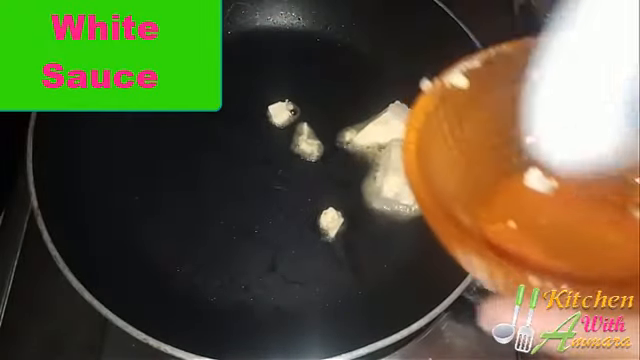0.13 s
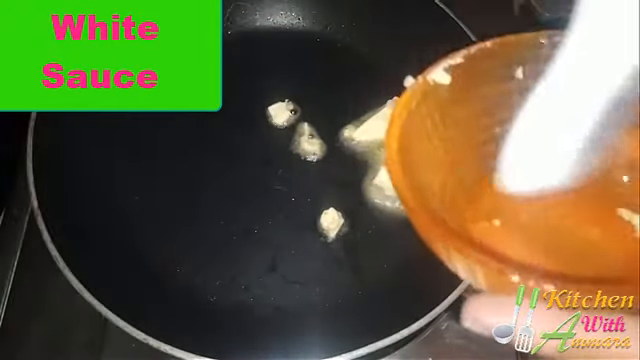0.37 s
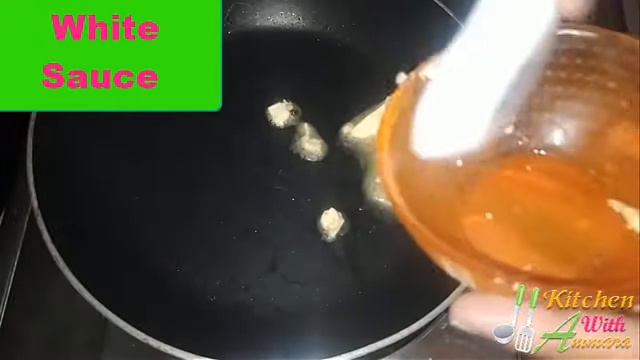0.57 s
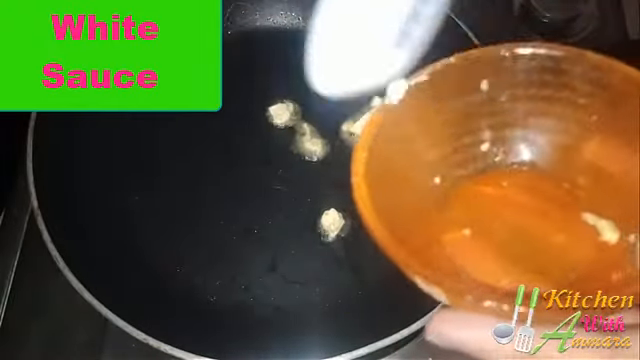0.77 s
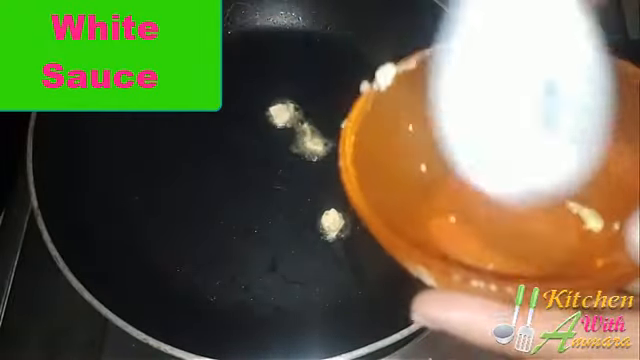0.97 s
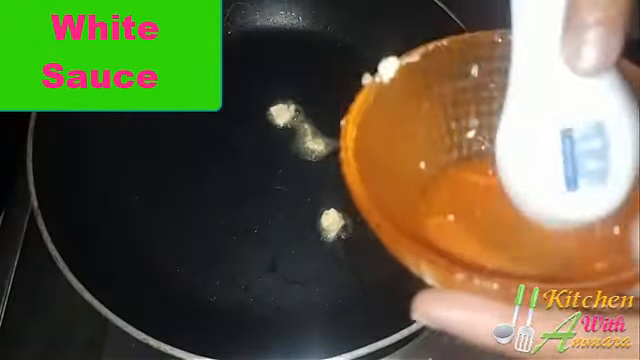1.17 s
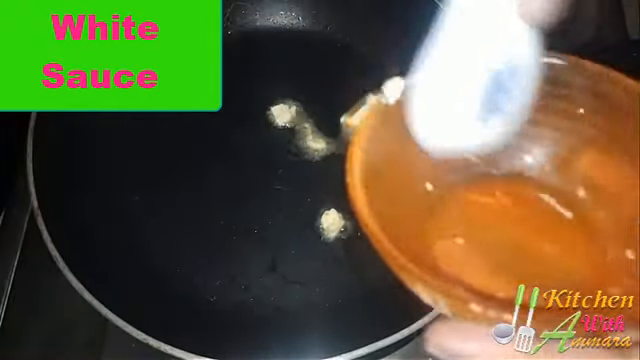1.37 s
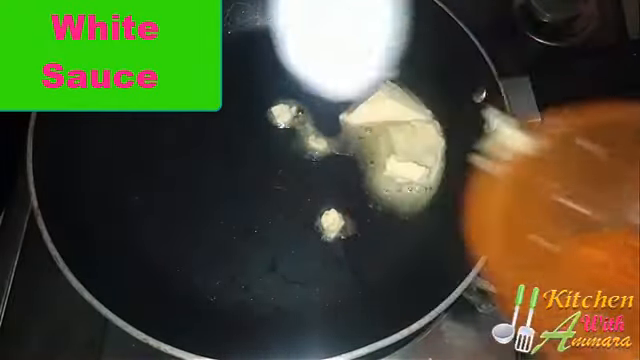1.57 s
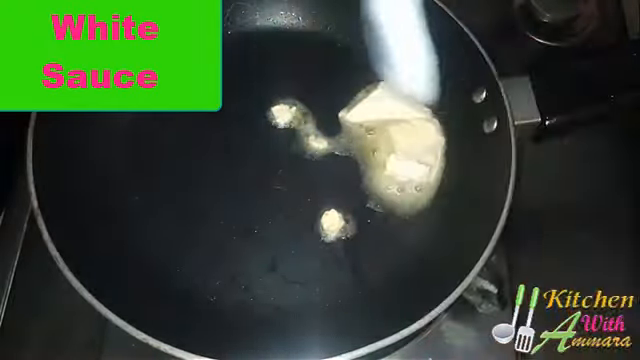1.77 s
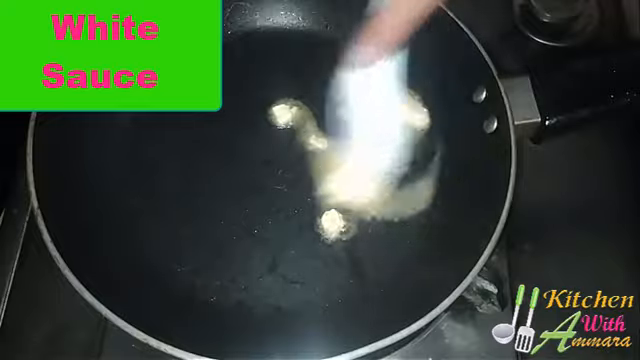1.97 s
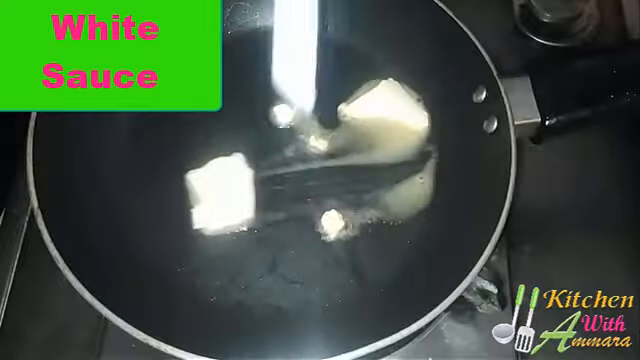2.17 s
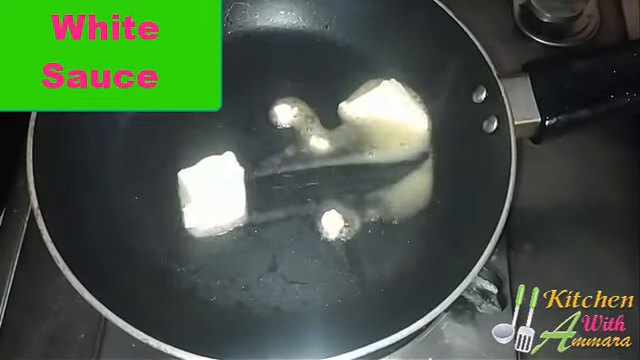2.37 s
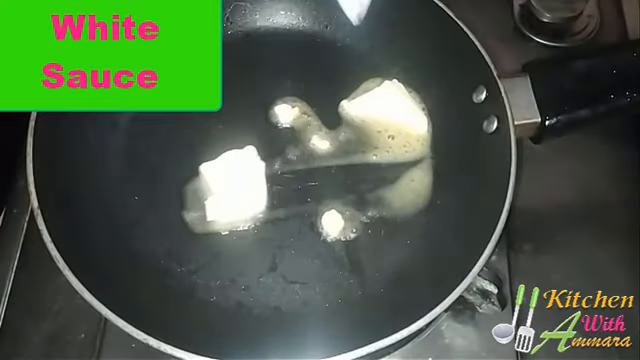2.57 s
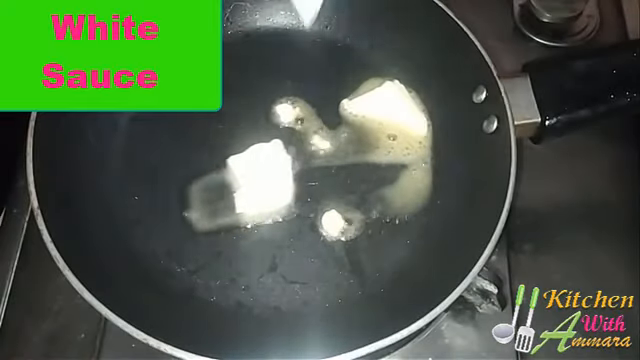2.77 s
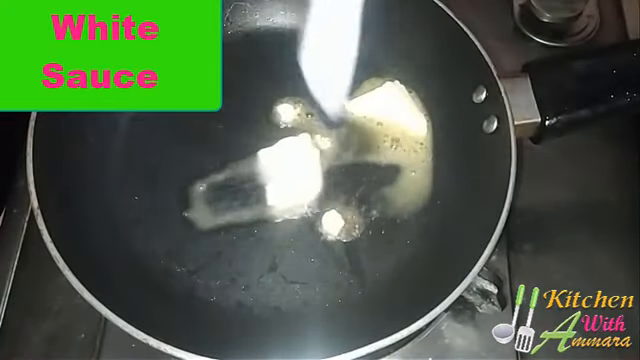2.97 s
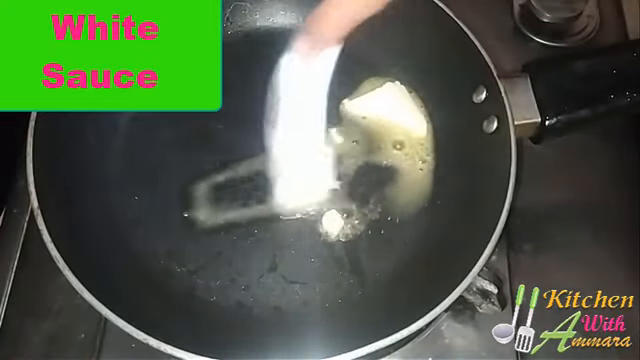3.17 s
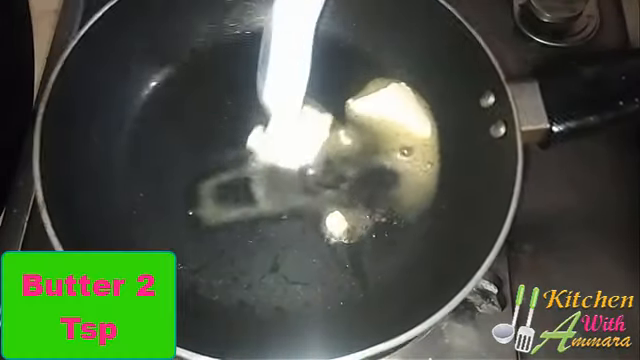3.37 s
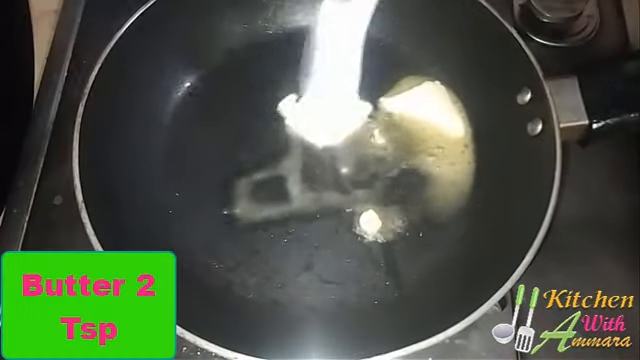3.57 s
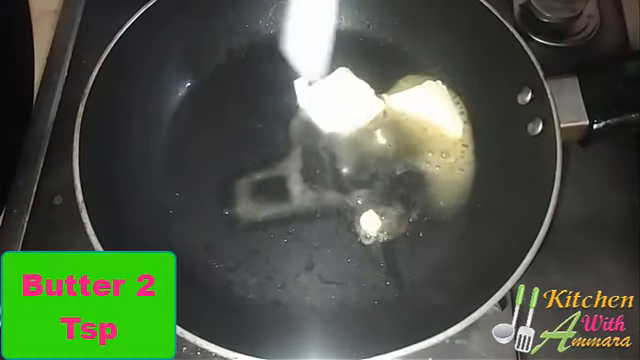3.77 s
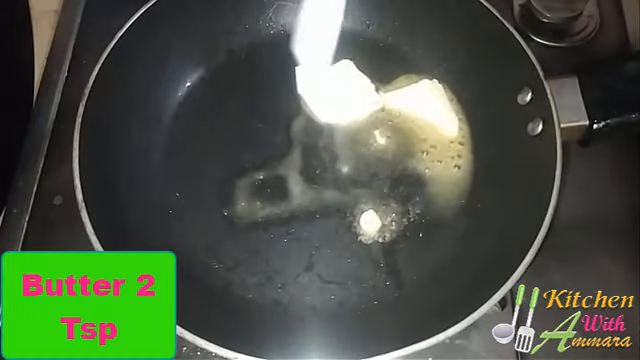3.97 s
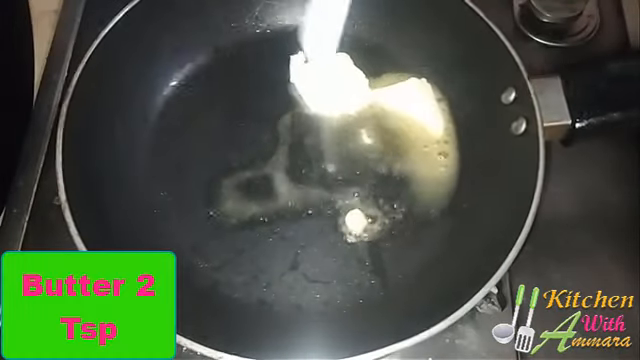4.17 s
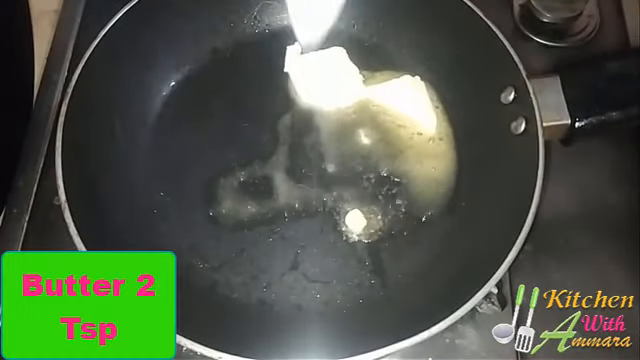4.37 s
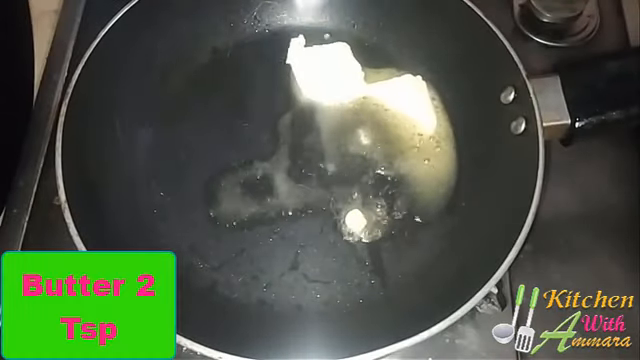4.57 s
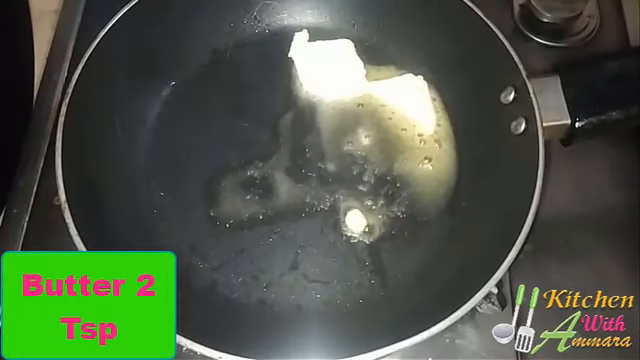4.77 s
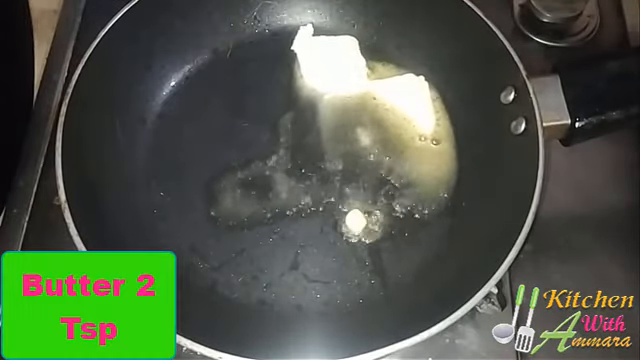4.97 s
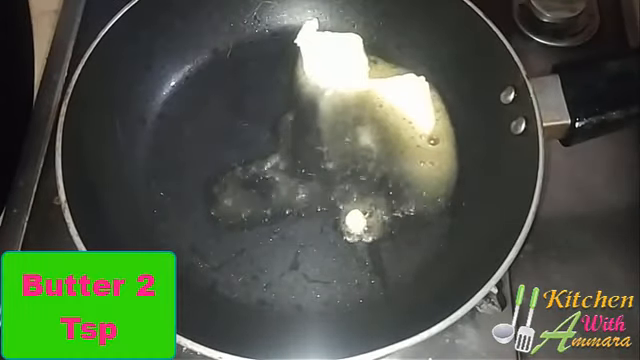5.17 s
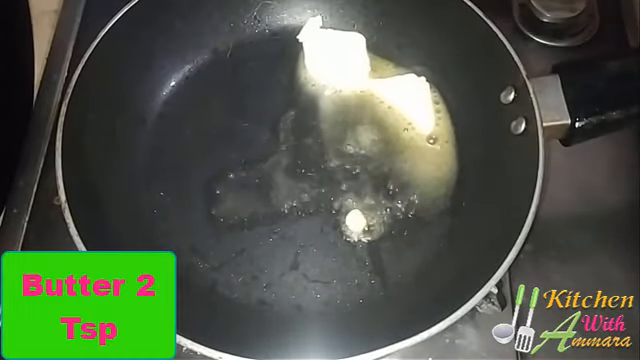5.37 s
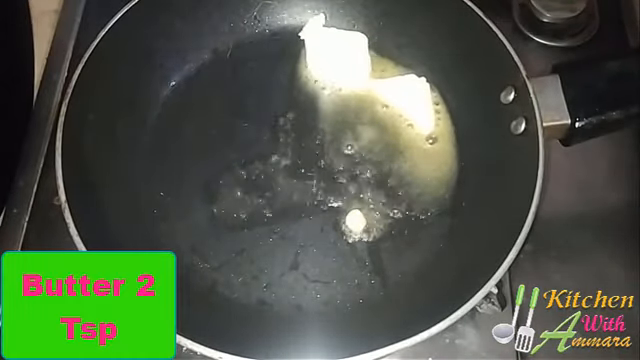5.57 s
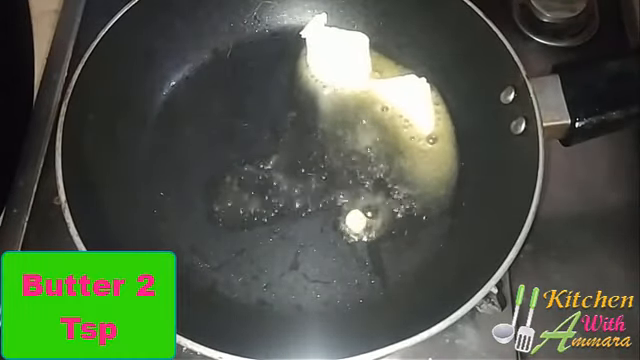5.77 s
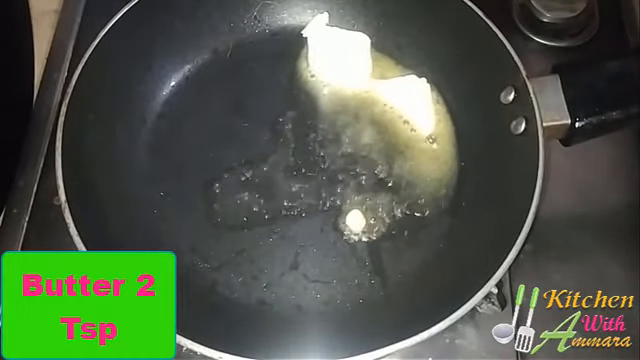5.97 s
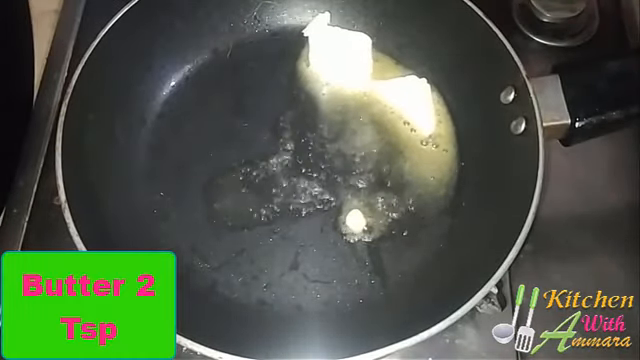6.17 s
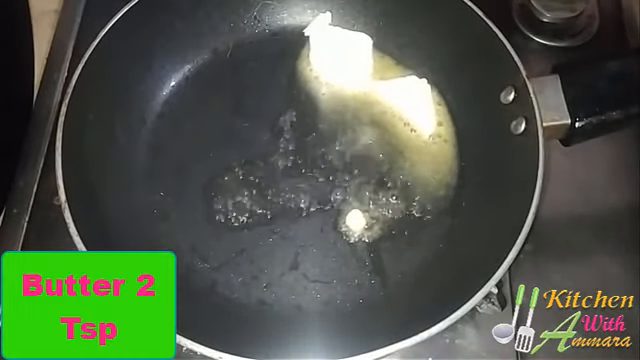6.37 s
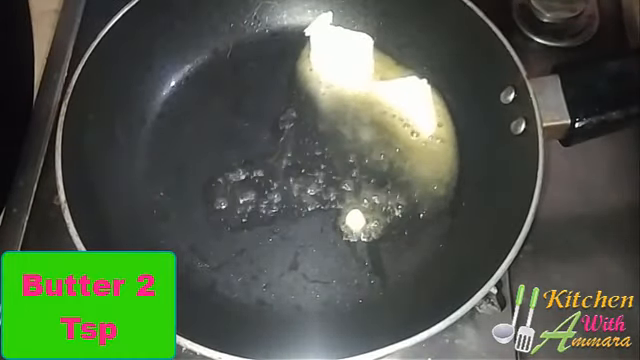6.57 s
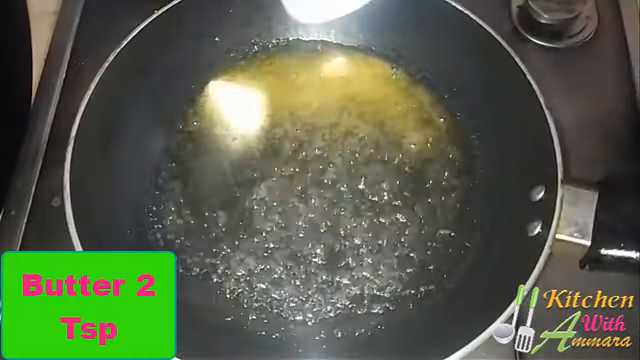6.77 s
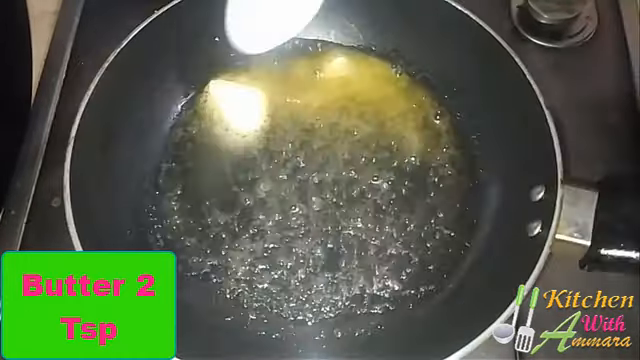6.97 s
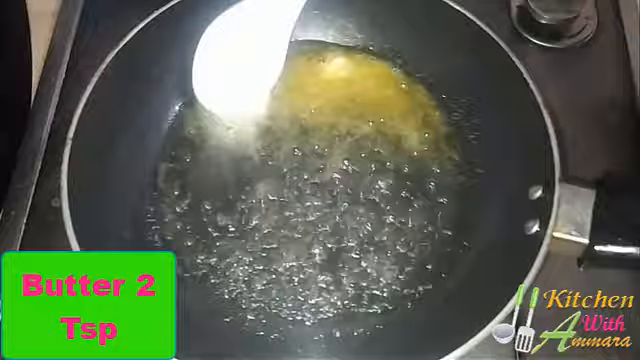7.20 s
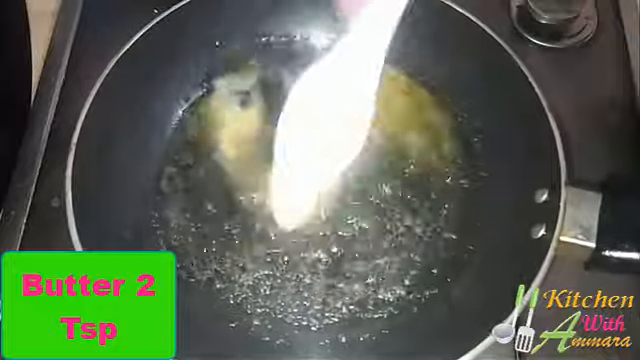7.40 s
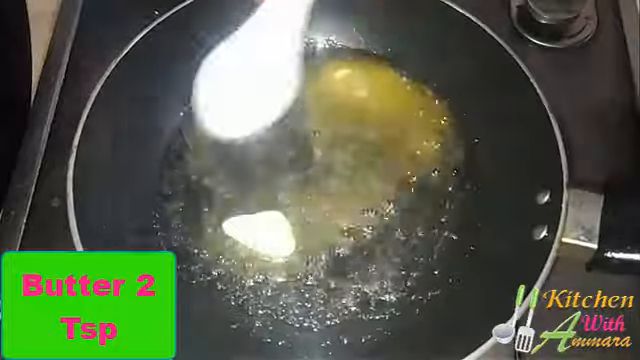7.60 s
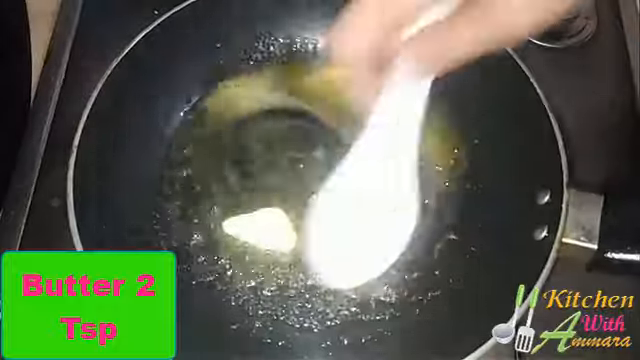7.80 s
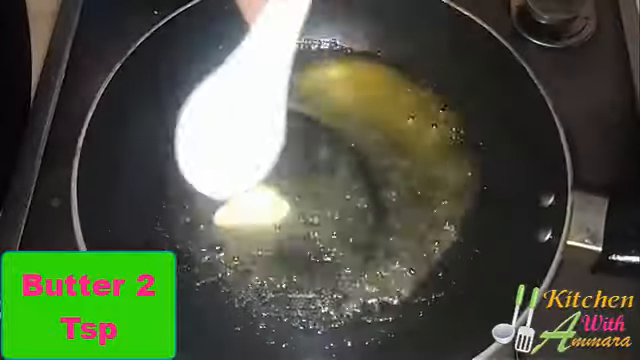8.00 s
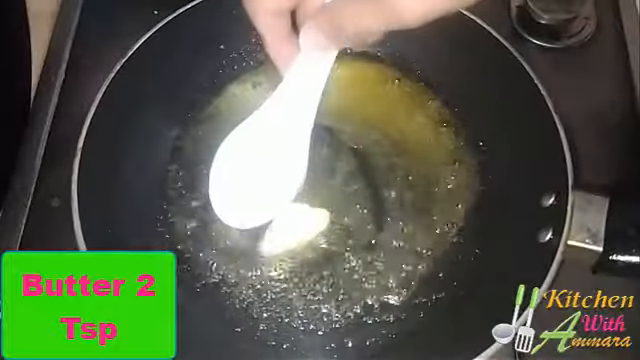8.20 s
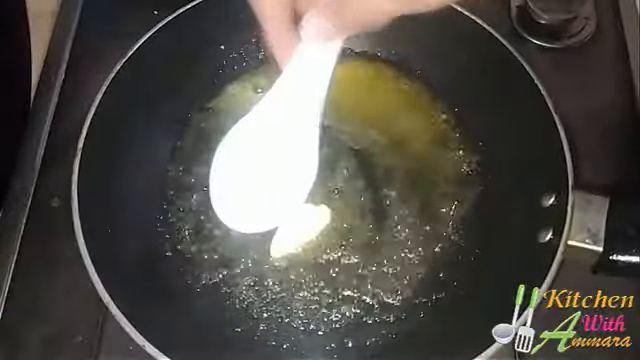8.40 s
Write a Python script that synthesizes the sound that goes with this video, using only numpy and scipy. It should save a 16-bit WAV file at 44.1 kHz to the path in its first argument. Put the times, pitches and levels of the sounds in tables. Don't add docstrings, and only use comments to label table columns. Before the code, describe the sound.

Fine, bright frying hiss with popping fat, heard close in a lightly reverberant kitchen. First come hard hollow knocks of a spoon on a bowl, some ringing high. A rough stick-slip scrape of pan on steel follows, ending in a short squeal. A calmer stretch holds dull bumps, ticks and spray flares; finally a clacking spoon grinds the pan in two strokes, sizzle surging, with one last hard knock.

```python
import sys
import numpy as np
from scipy import signal
from scipy.fft import rfft, irfft, next_fast_len
from scipy.io import wavfile
from scipy.ndimage import uniform_filter1d, minimum_filter1d, map_coordinates

SR = 44100
rng = np.random.default_rng(int(sys.argv[2]) if len(sys.argv) > 2 else 0)


def ratio_of_db(decibels):
    return 10 ** (np.asarray(decibels, float) / 20)


def put_to_file(sound):
    columns = np.atleast_2d(sound).T
    safe = np.clip(columns, -1, 1)
    whole_steps = np.round(safe * 32767)
    wavfile.write(sys.argv[1], SR, whole_steps.astype(np.int16))


N = 372204


def unit(x):
    return x / np.sqrt(np.mean(x ** 2) + 1e-20)


def along(points, hz):
    f, v = np.transpose(points)
    return np.interp(np.log(hz + 1), np.log(f + 1), v)


def curves(rows):
    s, *columns = np.transpose(rows)
    ends_early = s[-1] < N / SR - .1
    t = np.arange(N) / SR
    return [np.interp(t, s, c, left=-150, right=-150 if ends_early else c[-1]) for c in columns]


def wobble(rate):
    steps = np.arange(0, N + 16, 16)
    knots = rng.standard_normal(int(N * rate / SR) + 4)
    return np.interp(np.arange(N), steps, map_coordinates(knots, [steps * rate / SR]))


def filtered(x, response):
    m = next_fast_len(N + SR // 2)
    return irfft(rfft(x, m) * response(np.fft.rfftfreq(m, 1 / SR)), m)[..., :N]


def colour(points):
    return lambda hz: ratio_of_db(along(points, hz))


def modes(table):
    def response(f):
        return sum((-1) ** k * ratio_of_db(db) * 1j * f * width / (hz * hz - f * f + 1j * f * width)
                   for k, (hz, width, db) in enumerate(table))
    return response


def tinted(points):
    return unit(filtered(rng.standard_normal(N), colour(points)))


def grit(rate, spread_db, bed, t60):
    spread = np.minimum(rng.exponential(size=N), 3)
    sizes = (rng.random(N) < rate / SR) * ratio_of_db(spread_db * spread)
    puffs = signal.lfilter([1], [1, -ratio_of_db(-60 / (t60 * SR))], sizes)
    return unit((unit(puffs) + bed) * rng.standard_normal(N))


def bursts(times, levels_db, t60, tail_db, tail_t60):
    blows, t = np.zeros(N), np.arange(SR // 4) / SR
    np.add.at(blows, np.round(np.asarray(times) * SR).astype(int), ratio_of_db(levels_db))
    decay = ratio_of_db(-60 * t / t60) + ratio_of_db(tail_db - 60 * t / tail_t60)
    return signal.oaconvolve(blows, decay)[:N]


def snaps(times, levels_db, points):
    clicks = np.zeros(N)
    signs = rng.choice([-1, 1], len(times))
    clicks[np.round(np.asarray(times) * SR).astype(int)] = ratio_of_db(levels_db) * signs
    return filtered(clicks, colour(points)) / np.mean(colour(points)(np.fft.rfftfreq(SR, 1 / SR)))


def swells(rows):
    t = np.arange(0, N + 32, 32) / SR
    gain = 0
    for s, hold, db, rise, fall in rows:
        before, after = np.maximum(s - t, 0), np.maximum(t - s - hold, 0)
        gain = gain + ratio_of_db(db - rise * before - fall * after)
    return np.interp(np.arange(N) / SR, t, gain)


def thin(x, hz):
    return signal.sosfilt(signal.butter(3, hz, "high", fs=SR, output="sos"), x)


def placed(x, rows):
    side_db = np.interp(np.arange(N) / SR, rows[:, 0], np.clip(rows[:, -1], -4, 4))
    return x * ratio_of_db(np.array([side_db, -side_db]) / 2)


# time_s, level_db
AIR = [(0, -53), (3.6, -58.5), (8.44, -57.5)]
# frequency_hz, density_db
RUMBLE = [(12, -19), (20, 7), (32, -7.5), (83, 0), (117, -18.5), (151, -3), (173, -4.5), (204, -4.5),
          (313, -14), (392, -14), (700, -12.5), (910, -55), (1540, -120)]
# time_s, level_db
HUM = [(0, -57), (2.5, -58.5), (2.7, -91), (8.44, -96)]


def kitchen_air():
    t = np.arange(N) / SR
    hum = ratio_of_db(curves(HUM)[0] + 3 * wobble(4.5)) * np.sin(2 * np.pi * 87 * t)
    mains = ratio_of_db(-64.0 + 1.4 * wobble(3.52)) * np.sin(2 * np.pi * 150 * t)
    counter = ratio_of_db(-12.5) * bumps(fall=110)
    return (ratio_of_db(curves(AIR)[0]) + counter) * ratio_of_db(-1.4) * tinted(RUMBLE) + hum + mains


# frequency_hz, t60_s
KITCHEN = [(200, 0.81), (2000, 0.6), (8000, 0.87), (15000, 0.037)]


def room(x):
    hz, t, z = signal.stft(rng.standard_normal((2, SR // 2)), SR, nperseg=256)
    tail = signal.istft(z * ratio_of_db(-60 * t / along(KITCHEN, hz)[:, None]), SR, nperseg=256)[1]
    delayed = np.pad(x, (300, 0))
    return signal.fftconvolve(delayed[None], tail / np.linalg.norm(tail[0]), axes=1)[:, :N]


# start_s, boom_db, rustle_db
BUMPS = [(2.1, -48.5, -80), (2.66, -37, -80), (3.4, -39.5, -80), (3.671, -29, -35), (4.272, -43, -43),
         (4.363, -38.5, -46), (5.324, -49, -43.5), (6.202, -54, -46), (6.481, -51, -44), (7.375, -43, -54),
         (7.465, -33.5, -39), (8.39, -40, -78)]


def bumps(fall):
    return swells([(s, 0, db, 750, fall) for s, db, _ in BUMPS])


def rocking():
    shifts = swells([(s, 0, db, 730, 190) for s, _, db in BUMPS])
    boom = unit(filtered(rng.standard_normal(N), modes([(206.3, 6.2, 0)])))
    rustle_modes = modes([(341, 220, 1.5), (470, 170, 2.5), (670, 135, 4.0), (1360, 140, -2.0), (2120, 390, -7)])
    rustle = unit(filtered(grit(rate=51, spread_db=4.5, bed=0.28, t60=0.081), rustle_modes))
    drag_boom = ratio_of_db(curves(DRAG)[0] - 16)
    return (bumps(fall=98) + drag_boom) * boom + shifts * ratio_of_db(4.5) * rustle


# time_s, level_db
DRAG = [(2.545, -69), (2.551, -15.5), (2.815, -38.5), (2.857, -20.5), (2.897, -26), (3.1, -25),
        (3.197, -16), (3.261, -28.5), (3.4, -48)]
# start_s, peak_db
JOLTS = [(2.5082, -27), (2.5513, -8), (2.587, -10.5), (2.7637, -30), (2.8535, -12), (2.9727, -14),
         (3.0176, -16), (3.0513, -11), (3.095, -16), (3.1284, -7.5), (3.164, -15)]
# frequency_hz, width_hz, level_db
PAN = [(467, 21, -13), (980, 6.9, -2), (1653, 7.4, 8), (2100, 28, -15), (2530, 56, -17), (2988, 43, -6.5),
       (3390, 69, -20), (3980, 15, -9.5)]
# frequency_hz, density_db
RUB = [(150, -60), (250, -16.5), (467, -20), (1180, -9.5), (1630, -5), (2020, -8.5), (3970, -23.5),
       (4300, -25.5), (6000, -38), (7800, -57), (13200, -120)]
# frequency_hz, width_hz, level_db
STEEL = [(8914, 24, 12), (14190, 40, -11)]
# start_s, hold_s, level_db, rise_db_per_s, fall_db_per_s
SQUEAL = [
    (3.18, 0.0043, -22.5, 2500, 252),
]


def drag():
    rub_db, = curves(DRAG)
    slips = grit(rate=230, spread_db=0.0, bed=1.0, t60=0.0063)
    pan = unit(unit(filtered(slips, colour(RUB))) + 0.98 * unit(filtered(slips, modes(PAN))))
    s, db = np.transpose(JOLTS)
    jolts = bursts(s, db - 14, t60=0.06, tail_db=-4, tail_t60=0.066) * tinted(RUB)
    jolts = jolts + snaps(s, db - 23, RUB)
    steel = unit(filtered(slips, modes(STEEL)))
    steel_gain = ratio_of_db(6.0) * (ratio_of_db(rub_db - 20) + swells(SQUEAL))
    return ratio_of_db(rub_db) * pan + thin(jolts, hz=410) + steel_gain * steel


# start_s, peak_db, pitch_hz
TICKS = [(3.535, -38.5, 1540), (3.5787, -31, 2500), (3.6612, -31, 1600), (3.8454, -33.5, 2530),
         (3.9621, -32, 2625), (4.035, -34.5, 2560), (4.262, -26, 1330), (4.3333, -33.5, 2670),
         (4.6703, -31, 2630), (5.6864, -35, 1647), (5.7422, -37, 2600), (6.385, -31.5, 2700),
         (6.513, -34.5, 1960), (6.7871, -36.5, 2710)]


def ticks():
    out, t = np.zeros(N + SR // 10), np.arange(SR // 10) / SR
    for s, db, hz in TICKS:
        drift = np.cumsum(rng.standard_normal(len(t))) * 0.11
        tone = np.sin(2 * np.pi * hz * t + drift)
        out[round(s * SR):][:len(t)] += ratio_of_db(db + 1.8 - 60 * t / 0.062) * tone
    return out[:N]


# start_s, peak_db, pitch_hz, contact_s
THUDS = [(2.111, -32, 743, 0.013), (3.372, -16, 770, 0.004), (3.663, -21.5, 735, 0.013),
         (3.721, -33.5, 720, 0.015), (3.771, -28, 597, 0.0039), (4.26, -23, 736, 0.011),
         (4.334, -34, 747, 0.024), (4.363, -26.5, 727, 0.0074), (5.878, -24, 970, 0.0017),
         (6.163, -33, 663, 0.0062), (6.515, -38, 710, 0.0099), (7.463, -18.5, 783, 0.01),
         (8.377, -4, 865, 0.0082)]


def thuds():
    out, t = np.zeros(N + SR // 4), np.arange(SR // 4) / SR
    for s, db, hz, contact in THUDS:
        drift = np.cumsum(rng.standard_normal(len(t))) * 0.076
        puff = signal.lfilter([.3, 0, -.3], [1, -1.72, .76], rng.standard_normal(len(t)))
        shape = (1 - np.exp(-t / 0.0011)) * (np.exp(-(t / contact) ** 2) + 0.15 * ratio_of_db(-60 * t / 0.063))
        tone = np.sin(2 * np.pi * hz * t + drift)
        out[round(s * SR):][:len(t)] += ratio_of_db(db) * shape * (tone + 0.12 * puff)
    return out[:N]


# start_s, peak_db, crack_db, left_minus_right_db
RAPS = [(0.044, -35, 2, 5), (.061, -28, 5.5, 5), (0.095, -30, 4.5, 6), (.376, -33.5, 0, -4),
        (.431, -3.5, -31, 4), (0.691, -33, 5, -5), (1.153, -25, 1, -7), (1.158, -41.5, 14, -6),
        (1.269, -10.5, -1, 4), (1.33, -14.5, -11, 5), (1.517, -14, -4.5, -1), (2.3, -23, 7.5, -7),
        (3.5804, -33.5, 15.5, -8), (7.449, -20.5, -25, 2), (7.497, -4, -16, 15), (8.375, -3.5, -19, 8)]
# frequency_hz, density_db
BOWL = [(150, -50), (250, -16), (861, -11), (1100, -2.5), (1620, 0.5), (2350, -3.5), (2810, 1.5),
        (3170, -8.5), (3500, -5.5), (4550, -30), (7700, -120)]
# frequency_hz, density_db
CRACK = [(2200, -8), (3000, 13), (4000, 12), (6200, 6.5), (11000, 4), (16000, -29), (17000, -60)]


def raps():
    rows = np.array(RAPS)
    s, db, crack_db, _ = rows.T
    click = bursts(s, db - .6, t60=0.0024, tail_db=-51, tail_t60=0.059)
    hollow = bursts(s, db - 7.5, t60=0.065, tail_db=-25, tail_t60=0.1)
    crack = bursts(s, db + crack_db - .6, t60=0.011, tail_db=-20.5, tail_t60=0.24)
    blows = (click + hollow) * tinted(BOWL) + crack * tinted(CRACK) + snaps(s, db + 1, BOWL)
    return placed(thin(blows, hz=600), rows)


# start_s, pitch_hz, level_db, t60_s
PINGS = [
    (.432, 8190, -5, 0.033),
    (0.433, 8730, -8.5, 0.15),
    (0.431, 8570, -28, 0.17),
    (0.431, 8230, -5, 0.056),
    (1.268, 8180, -1, 0.036),
    (1.269, 6150, -15.5, 0.052),
    (1.518, 8130, -20.5, 0.031),
]


def pings():
    out, t = np.zeros(N + SR // 3), np.arange(SR // 3) / SR
    for s, hz, db, t60 in PINGS:
        drift = np.cumsum(rng.standard_normal(len(t))) * 0.071
        out[round(s * SR):][:len(t)] += ratio_of_db(db - 60 * t / t60) * np.sin(2 * np.pi * hz * t + drift)
    return out[:N]


# start_s, length_s, level_db, release_db_per_s, hollow_hz at the turn
STROKES = [
    (7.458, 0.0027, -29, 548, 790),
    (7.527, 0.2, -19, 122, 1160),
    (7.879, 0.14, -21.5, 450, 920),
]
# frequency_hz, density_db
SCRAPE = [(180, -71), (300, -70), (489, 4), (595, -49), (725, 2), (969, 8), (1300, -36), (1600, -2),
          (2080, -10), (2570, -5.5), (7000, -14), (9100, -43), (15400, -120)]


def scrape():
    t = np.arange(N) / SR
    rest_hz, turn_at, turn_width = 730, 0.61, 0.31
    turns, done = [], 0
    for s, length, *_ in STROKES:
        turns.append(np.exp(-((t - s - turn_at * length) / (turn_width * length)) ** 2))
        done = done + np.clip((t - s) / length, 0, 1) * (t < s + 1.4 * length)
    hollow_hz = rest_hz + sum(turn * (row[-1] - rest_hz) for turn, row in zip(turns, STROKES))
    press = swells([(s, length, db, 900, release) for s, length, db, release, _ in STROKES])
    press = press * ratio_of_db(-1.5 * sum(turns) - 2 * done)
    slips = grit(rate=700, spread_db=0.0, bed=3.4, t60=0.029)
    high = np.clip((hollow_hz - 750) / 350, 0, 1)
    low_cup, high_cup = (unit(filtered(slips, modes([(hz, 150, 0)]))) for hz in (760, 1050))
    cup = np.sqrt(1 - high) * low_cup + np.sqrt(high) * high_cup
    ring = unit(filtered(slips, modes([(1640, 39, 4.1), (1540, 30, 2.4)])))
    edge = unit(filtered(slips, colour(SCRAPE))) + 1.04 * ring
    return ratio_of_db(0.9) * press * unit(thin(edge + .9 * cup, hz=487))


def beads():
    pitch_hz, pitch_spread, life_cycles, scatter_db = 9090, .16, 5.6, 4.5
    k = np.arange(128)
    start = rng.integers(0, N, (700, 1))
    size = ratio_of_db(scatter_db * np.minimum(rng.exponential(size=(700, 1)), 3))
    cycles = pitch_hz * np.exp(pitch_spread * rng.standard_normal(start.shape)) * k / SR
    grains = size * np.sin(2 * np.pi * cycles) * np.exp(-cycles / life_cycles) * (1 - np.exp(-cycles))
    return np.bincount((start + k).ravel(), grains.ravel(), N + len(k))[:N]


# time_s, level_db
HEAT = [(0, -41), (.4, -39), (.56, -35.5), (1.1, -38), (1.34, -36.5), (1.95, -37.5), (2.4, -32.5),
        (2.75, -32.5), (3.4, -36), (4.94, -35), (5.36, -34), (5.71, -34.5), (6.82, -32.5), (7.19, -33),
        (7.5, -33), (7.87, -28), (8.11, -28.5), (8.44, -28)]
# time_s, level_db
POOL = [(0, -55.5), (1.1, -50.5), (1.34, -61.5), (2.2, -57.5), (3.02, -62), (3.12, -46), (3.8, -48),
        (4.1, -52), (8.44, -52)]
# start_s, hold_s, level_db, rise_db_per_s, fall_db_per_s
STIRRED = [
    (7.87, 0, -38, 76, 64),
]
# frequency_hz, density_db
FIZZ = [(1760, -33), (3000, -24), (3170, -26), (4090, -13.5), (4460, -14.5), (6960, -5.5), (9110, 4),
        (10400, 2.5), (13600, -12.5), (15100, -8.5), (15900, -41), (16300, -41)]
# frequency_hz, density_db
SPUTTER = [(210, -16.5), (350, -7.5), (691, -30.5), (821, -6.5), (1360, -7), (1600, 1.5), (1950, -8.5),
           (2570, 1.5), (3160, -1.5), (5500, -0.5), (7150, -3), (12100, -120)]


def sizzle():
    fizz_db, = curves(HEAT)
    pool = ratio_of_db(curves(POOL)[0]) + swells(STIRRED)
    clumps = ratio_of_db(0.86 * wobble(25) + 0.91 * wobble(70))
    fizz = unit(filtered(clumps * grit(rate=300, spread_db=4.5, bed=1.63, t60=0.011), colour(FIZZ)))
    pan_ticks = clumps * grit(rate=100, spread_db=-6.5, bed=0.91, t60=0.05)
    body = unit(filtered(pan_ticks, colour(SPUTTER)))
    ring = unit(filtered(pan_ticks, modes([(750, 64, 1.0), (1596, 70, 10.5), (2550, 70, -17)])))
    steam = ratio_of_db(fizz_db + 0.5) * (fizz + ratio_of_db(6.5) * beads())
    return steam + ratio_of_db(6.0) * pool * (body + 0.35 * ring)


# start_s, peak_db, body_db
SPITS = [(0.0418, -13.5, -28), (.375, -15, -28), (0.4332, -8, -36), (1.118, -20, -10), (1.1521, -5, -30),
         (1.2675, -11.5, -3.5), (1.6193, -23.5, -0.5), (2.1673, -15.5, -25), (2.2998, -10.5, -27),
         (2.3246, -13.5, -31), (2.6964, -13, -40), (2.731, -14, -28), (2.837, -19, -35),
         (2.9454, -11.5, -37), (3.177, -22, 4), (3.323, -12, -37), (3.799, -16, -34), (3.8136, -17.5, -34),
         (4.383, -13.5, -14), (4.7008, -15, -29), (5.413, -20, -3.5), (5.474, -12.5, -20.5),
         (6.1598, -16, -11), (6.351, -17.5, -15), (6.5125, -10.5, -19), (7.1596, -17.5, -15),
         (7.247, -16, -16), (7.4962, -5.5, -3), (8.362, -11, -28), (8.3741, -5, 2.5)]
# start_s, peak_db
DROPLETS = [(0.6782, -23), (.82, -20), (0.933, -20), (2.226, -21.5), (3.0523, -18), (3.1233, -21),
            (3.1403, -13), (3.6887, -30), (3.707, -16), (4.0346, -26), (4.1055, -24), (4.2223, -20),
            (4.519, -21), (4.6202, -15.5), (4.734, -21), (5.123, -18.5), (5.307, -17), (5.817, -19.5),
            (5.868, -17.5), (6.0729, -15), (6.129, -19), (6.1968, -16.5), (6.7025, -18.5), (6.7387, -15.5),
            (6.897, -23), (7.205, -27), (7.6934, -21)]
# middle_s, level_db, half_length_s
FLARES = [
    (0.184, -29, 0.015),
    (2.33, -35, 0.17),
    (2.851, -26, 0.01),
    (4.23, -38, 0.019),
    (4.345, -32.5, 0.025),
    (5.354, -24, 0.031),
    (6.17, -30.5, 0.033),
    (6.523, -27.5, 0.011),
    (7.224, -35.5, 0.058),
]


def spits():
    droplet_body_db = -18
    s, db, body_db = np.transpose(SPITS + [(s, db, droplet_body_db) for s, db in DROPLETS])
    t = np.arange(N) / SR
    swell = sum(ratio_of_db(level) * np.exp(-((t - mid) / half) ** 2) for mid, level, half in FLARES)
    needles = bursts(s, db - .6, t60=.007, tail_db=-15.5, tail_t60=0.1)
    crack = (needles + swell * ratio_of_db(2.04 * wobble(150))) * tinted(FIZZ)
    spray = bursts(s, db + body_db - 14.5, t60=0.048, tail_db=0, tail_t60=0.14)
    body = (spray + ratio_of_db(-11.5) * swell) * tinted(SPUTTER)
    skin = snaps(s, db - 5, FIZZ)
    return thin(crack + body + skin, hz=463)


# frequency_hz, left_right_likeness (0 to 1)
ALIKE = [(30, .75), (70, .92), (150, .97), (300, .72), (600, .75), (1200, .22), (15000, 0)]
# frequency_hz, left_minus_right_db
LEAN = [(60, -2.5), (180, -1), (550, 1), (1650, 1), (4970, -3), (15000, 2.5)]


def ports(pair):
    t = np.arange(SR // 20) / SR
    echoes = rng.standard_normal((6, len(t))) * ratio_of_db(-60 * t / 0.028)
    echoes = echoes / np.linalg.norm(echoes, axis=1)[:, None]
    spots = ratio_of_db(14 * np.array([wobble(45) for _ in echoes]))
    parts = pair.mean(axis=0) * spots / np.linalg.norm(spots, axis=0)
    scattered = signal.oaconvolve(parts, echoes, axes=1).sum(axis=0)[:N]

    def angle(hz):
        return np.arccos(np.clip(along(ALIKE, hz), 0, 1)) / 2

    direct = filtered(pair, lambda hz: np.cos(angle(hz)))
    side = filtered(scattered, lambda hz: np.sin(angle(hz)))
    return filtered(direct + [side, -side], lambda hz: ratio_of_db(np.outer([.5, -.5], along(LEAN, hz))))


# frequency_hz, share of cells left empty (0 to 1)
STARVED = [(2300, 0), (3200, .42), (5500, .42), (7300, .16), (8200, 0), (11500, 0), (12500, .22),
           (15000, .2), (15600, .4)]


def starve(pair):
    hz, _, z = signal.stft([pair[0] + pair[1], pair[0] - pair[1]], SR, nperseg=1024)
    field = uniform_filter1d(rng.standard_normal(z.shape), size=5, axis=1)
    field = uniform_filter1d(field, size=4, axis=2)
    rank = .5 + .5 * np.tanh(.85 * unit(field))
    power = np.sum(np.abs(z[0]) ** 2, axis=0)
    attack = power > 3 * minimum_filter1d(power, size=4, origin=1)
    kept = np.where((rank < along(STARVED, hz)[:, None]) & ~attack, .02, 1)
    mid, side = signal.istft(z * kept, SR, nperseg=1024)[1][:, :N]
    return np.array([mid + side, mid - side]) / 2


def scene():
    hits = spits() + ticks() + raps() + thuds()
    near = kitchen_air() + rocking() + drag() + scrape() + pings() + sizzle() + hits
    return ports(near) + ratio_of_db(-11.0) * room(hits.mean(axis=0))


def low_pass(x):
    return signal.sosfilt(signal.butter(12, 16410, fs=SR, output="sos"), x)


def record(dry):
    band = filtered(np.clip(dry, -1, 1), lambda hz: hz < 15900)
    return low_pass(starve(band))


dry = scene()
out = record(dry)
put_to_file(out)
```